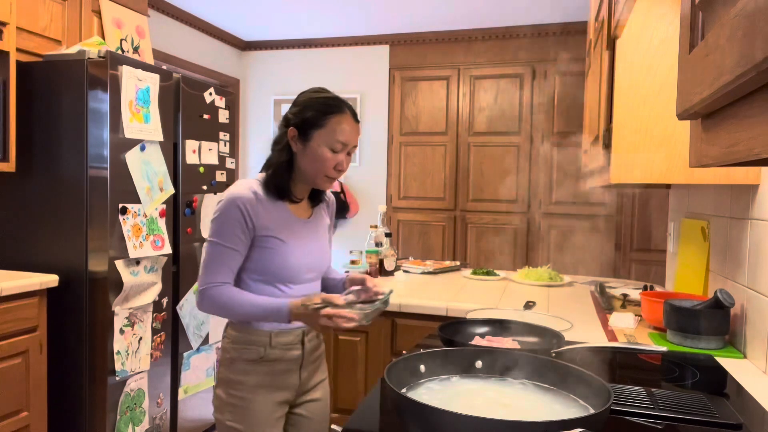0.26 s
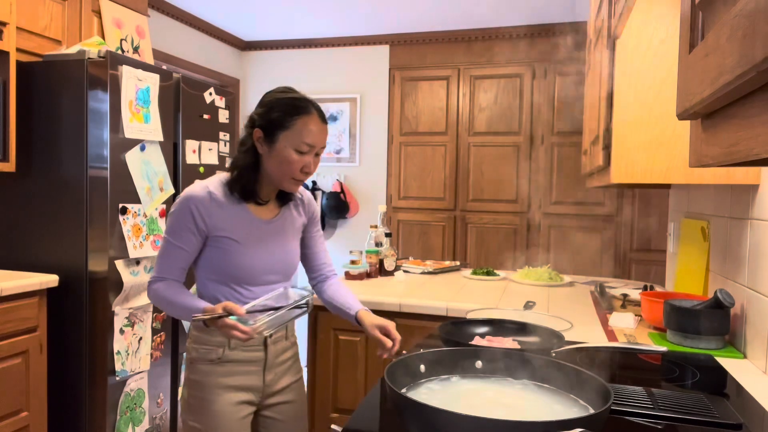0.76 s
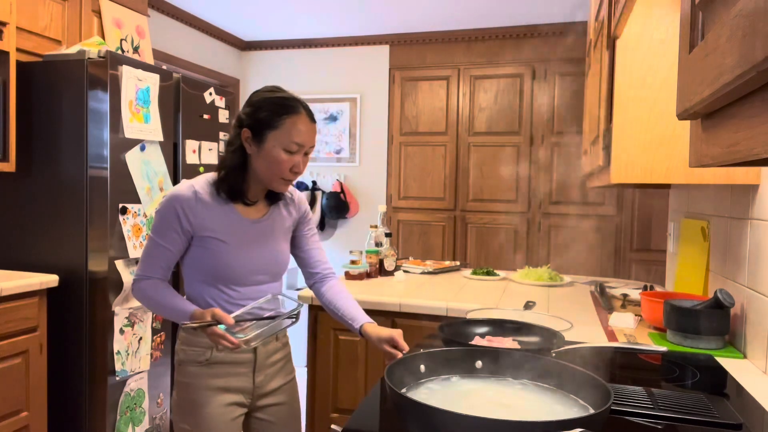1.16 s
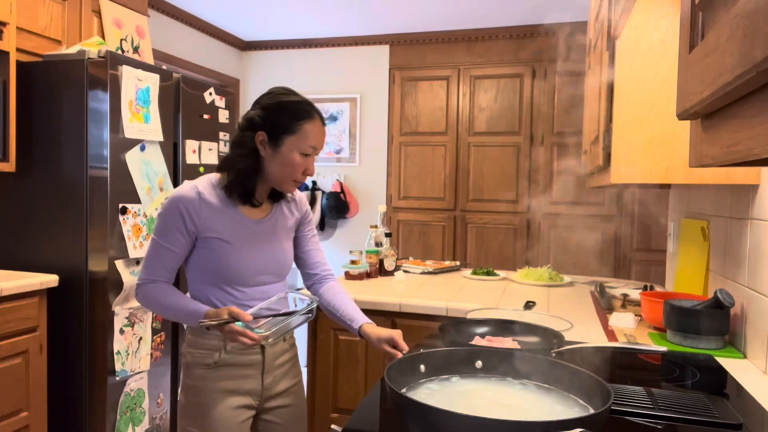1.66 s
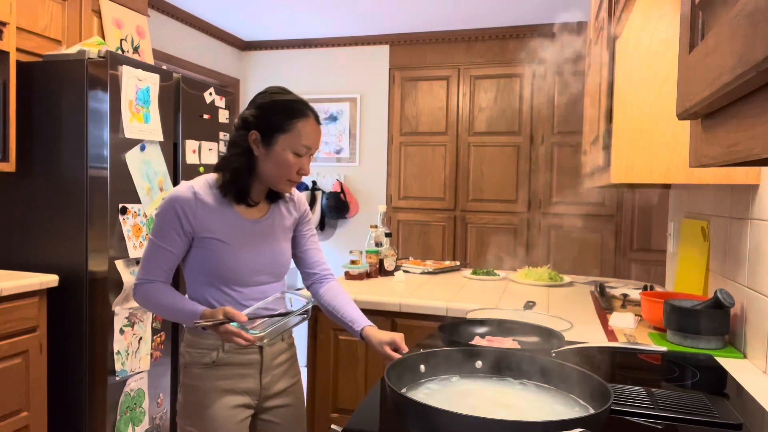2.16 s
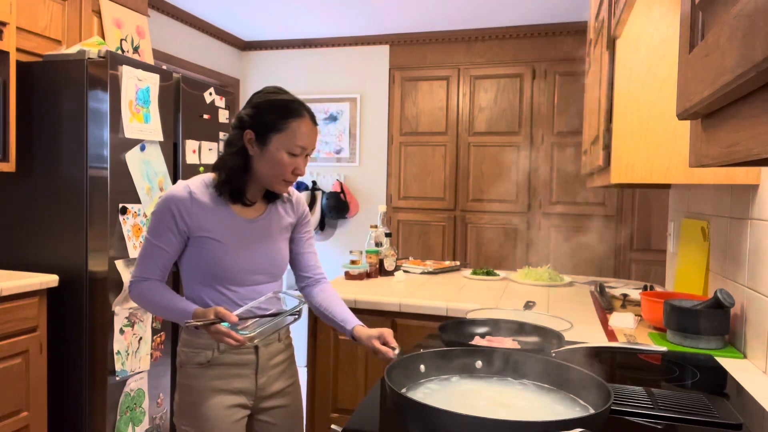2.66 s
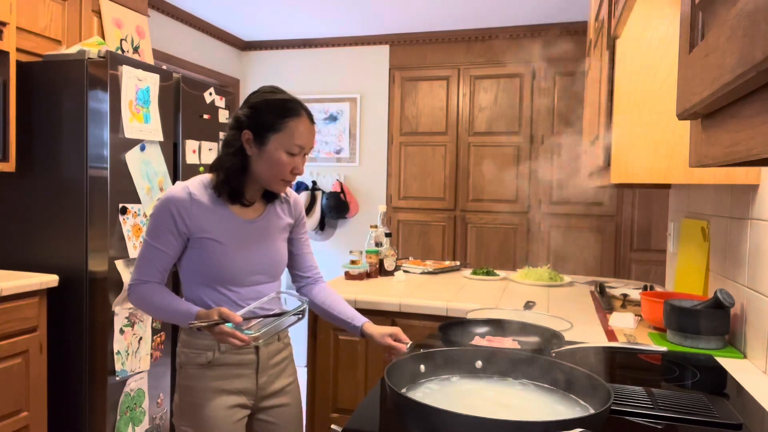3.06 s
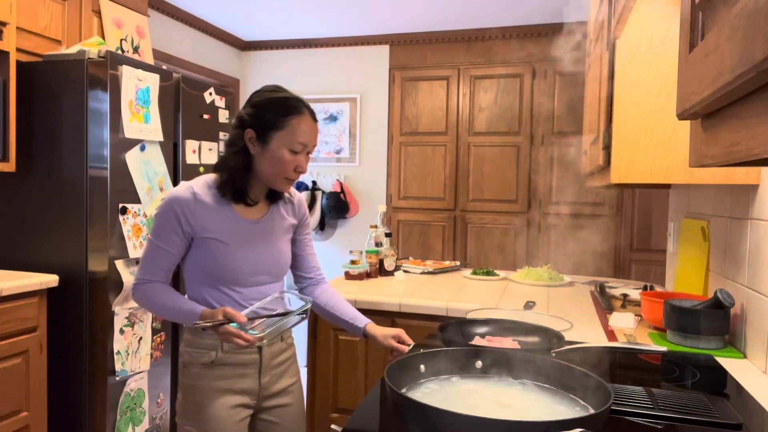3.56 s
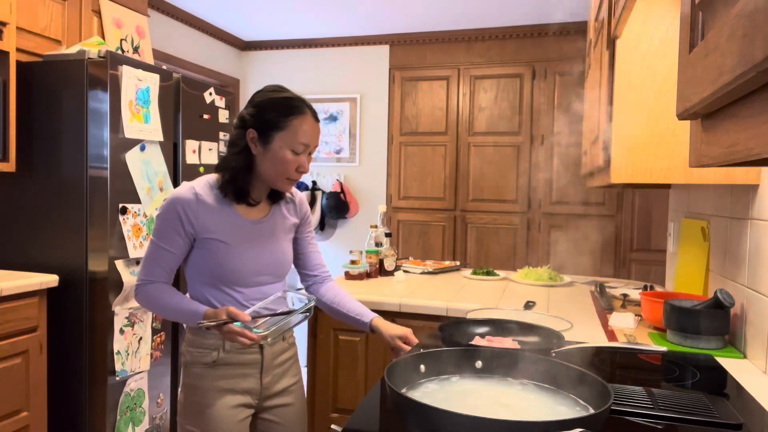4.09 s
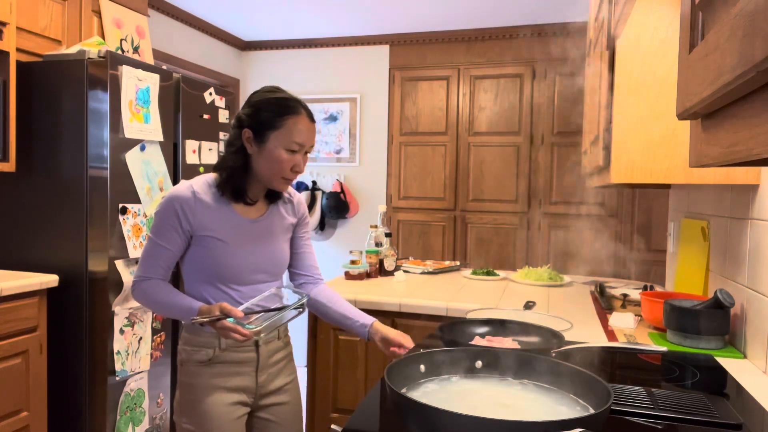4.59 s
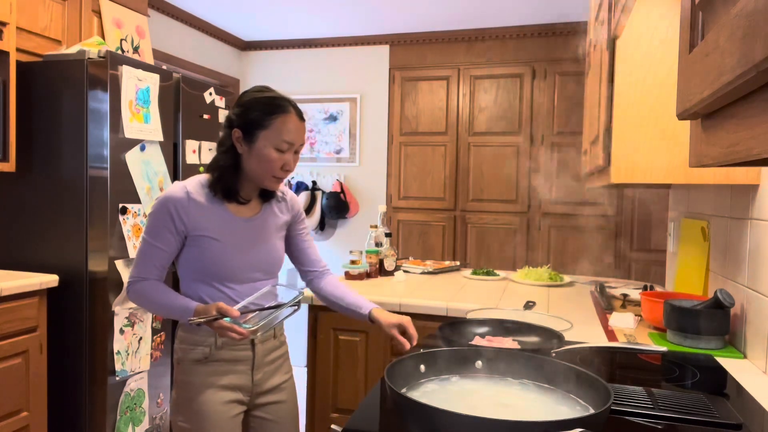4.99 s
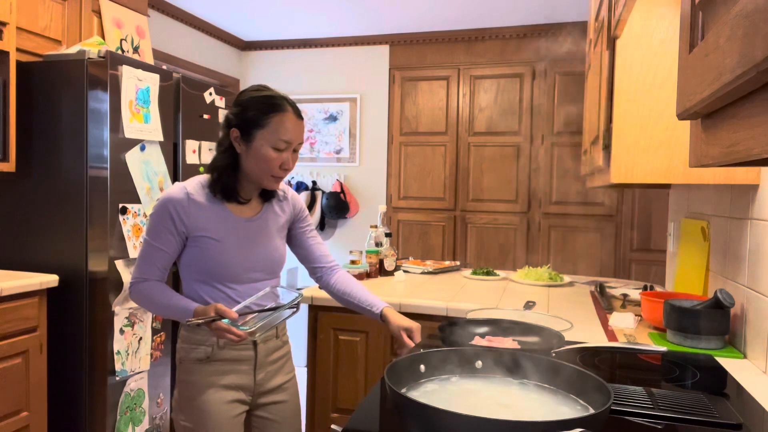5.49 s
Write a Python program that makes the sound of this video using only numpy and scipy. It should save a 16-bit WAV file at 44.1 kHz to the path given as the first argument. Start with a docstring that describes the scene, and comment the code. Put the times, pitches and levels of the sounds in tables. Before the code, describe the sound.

In a small kitchen, a bright glass clink gives way to a long pause, then sharp tong knocks and short scrapes on a pan over a low hum.

```python
"""A small kitchen: metal tongs clink on a glass dish, then knock and scrape on a frying pan.
Each blow is a burst of noise plus ringing tones; thuds are damped swings; scrapes are dense random slips.
A tip squeaks briefly, as a narrow wavering note. The kitchen adds echoes to all of these.
Behind them an extractor fan, made of shaped noise, rushes and rumbles in the room's low resonances.
A hob coil whines faintly on multiples of the mains frequency."""
import sys
import numpy as np
from scipy import signal
from scipy.fft import rfft, irfft
from scipy.io import wavfile
from scipy.ndimage import uniform_filter1d

SR = 44100
rng = np.random.default_rng(int(sys.argv[2]) if len(sys.argv) > 2 else 0)


def transcribe(signal):
    """Save signal, clipped to [-1, 1], as a 16-bit WAV file at the path in sys.argv[1]."""
    frames = np.atleast_2d(signal).T
    limited = np.clip(frames, -1, 1)
    pcm = np.round(limited * 32767).astype(np.int16)
    wavfile.write(sys.argv[1], SR, pcm)


N = 253134  # length in samples
HIT_N = int(.7 * SR)  # length of one blow or echo tail, samples
EARLY = int(.05 * SR)  # samples kept before time zero, so that earlier sounds still reach the room

# The pan's ringing tones, damped quickly by food and handle: f/Hz, relative level/dB, time to fall 60 dB/s
PAN_TONES = [(255, -7, 0.2), (324, -5.5, 0.13), (424, 7.5, 0.077), (506, 9, 0.06), (815, -20, 0.03),
             (1160, 14.5, 0.019), (1506, 11.5, 0.028), (1723, -52, 0.21), (1970, -18, 0.06),
             (2174, -25, 0.032), (2600, -13, 0.021), (2444, -9, 0.063), (3040, -35, 0.16),
             (3430, -16, 0.063), (4410, -39, 0.0642), (5140, -15, 0.086), (4860, -13, 0.034),
             (5830, 6, 0.074), (6800, -32, .05)]


def undb(db):
    """Turn decibels into gain."""
    return 10 ** (np.asarray(db) / 20)


def level(x, db):
    """Scale a sound to an rms level in dB."""
    return x * undb(db) / np.sqrt(np.mean(x ** 2) + 1e-30)


def decay(t, t60):
    """Die away by 60 dB in t60 seconds, as a damped vibration does."""
    return np.exp(-np.log(1000) * t / t60)


def on_log(table, n, col=1):
    """Read a table at the frequencies of an n-point transform, with straight lines over log frequency."""
    table = np.array(table, float)
    hz = np.fft.rfftfreq(n, 1 / SR)
    return np.interp(np.log(hz + 1), np.log(table[:, 0]), table[:, col])


def band_share(centres_hz, k):
    """Weight of band k: one at its centre, falling to zero at the neighbouring centres."""
    return on_log([(hz, j == k) for j, hz in enumerate(centres_hz)], HIT_N)


def colour(x, table):
    """Shape a sound's spectrum by (Hz, dB) points."""
    return irfft(rfft(x) * undb(on_log(table, x.shape[-1])), x.shape[-1])


def peak(hz, width_hz):
    """A resonance curve, one at its centre, over the frequencies of the whole length."""
    offset = np.fft.rfftfreq(N, 1 / SR) - hz
    return 1 / (1 + (offset / (width_hz / 2)) ** 2)


def walk(rate):
    """Random values drawn rate times a second and smoothed twice, with mean 0 and spread 1."""
    hold = int(SR / rate)
    steps = np.repeat(rng.standard_normal(N // hold + 1), hold)
    x = uniform_filter1d(uniform_filter1d(steps, hold), hold)[:N]
    return (x - x.mean()) / x.std()


def add(out, s, x):
    """Mix x in from time s; the buffer starts a little before zero."""
    i = int(s * SR) + EARLY
    x = x[:len(out) - i]
    out[i:i + len(x)] += x


def ring(modes):
    """A struck body rings as damped tones, with alternate signs down the list and unit total energy."""
    t = np.arange(HIT_N) / SR
    x = 0
    for k, (hz, db, t60) in enumerate(modes):
        x = x + (-1) ** k * undb(db) * np.sin(2 * np.pi * hz * t) * decay(t, t60)
    return x / np.sqrt(np.sum(x ** 2))


def blows(hits, modes, colour_db, ring_db):
    """Each blow cracks as it chatters and rings body and tongs; flat ones boom, hard ones are bright."""
    # The tongs' ringing tones: f/Hz, relative level/dB, time to fall 60 dB/s
    tongs_tones = [(3275, -5, .07), (3480, -8, .04), (3808, -9, .1), (7780, -6, .08), (7812, -5, .09),
                   (7990, -7, .07), (8105, -6, .09), (8380, -10, .07), (12310, -12, .07), (14347, 2, .11)]
    # Centres of the bands whose strengths are set one by one, the last for the tick: f/Hz
    bands_hz = (400, 750, 980, 1400, 2300, 3500, 5200, 8000, 14300)
    # How much of the boom each band below the tick takes: share
    boom_share = (0.88, .4, 0.56, 0, 0.38, 0.6, 0.06, 0.55)
    knee_hz = 1400  # a harder contact brightens everything above this
    clank_octaves = 0.44  # the spot struck lifts the tones this near its pitch
    rise_s, rise_cycles = 0.001, 1.13
    first = int(.03 * SR)  # levels are set over the first 30 ms

    out, t = np.zeros(N + EARLY), np.arange(HIT_N) / SR
    body = ring(modes)
    tongs = ring(tongs_tones) * (1 - np.exp(-(t / rise_s) ** 2))
    hz = np.array(bands_hz[:-1])
    octaves = np.clip(np.log2(hz / knee_hz), 0, None)
    for s, strength_db, boom_db, tilt_db, clank_hz, clank_db, tick_db, chatter, tongs_db in hits:
        crack = rng.standard_normal(HIT_N) * np.exp(-t / chatter)
        crack = crack / np.sqrt(np.sum(crack ** 2))
        spectrum = rfft(crack + undb(ring_db) * body)

        band_db = strength_db + np.array(colour_db)
        band_db = band_db + boom_db * np.array(boom_share) + tilt_db * octaves
        clank_nearness = np.exp(-(np.log2(hz / clank_hz) / clank_octaves) ** 2)
        band_db = band_db + clank_db * clank_nearness

        sound = tongs * undb(tongs_db) / np.std(tongs[:first])
        for k, db in enumerate([*band_db, tick_db]):
            band = irfft(spectrum * band_share(bands_hz, k), HIT_N)
            # low tones need a few swings to build up, so the bass comes late
            build_s = rise_s + rise_cycles / bands_hz[k]
            band = band * (1 - np.exp(-(t / build_s) ** 2))
            sound = sound + band * undb(db) / np.std(band[:first])
        add(out, s, sound[:HIT_N - first])
    return out


def clinks():
    """The tongs strike the glass dish, which rings clearly through the crack of the contact."""
    # Blows on the dish, levels before room and final mix: t/s, strength/dB, boom/dB,
    # treble slope/dB per octave, clank f/Hz, clank lift/dB, top tick level/dB, chatter decay/s, tongs level/dB
    dish_hits = [(-0.03, -40.5, -5, 1, 5100, -5, -48, 0.036, -73),
                 (0.0840, -32, -7.5, -4, 3230, 5.5, -63, 0.014, -62)]
    # The dish's ringing tones: f/Hz, relative level/dB, time to fall 60 dB/s
    dish_tones = [(1834, -15, 0.073), (2014, -1, 0.15), (2290, -6, 0.085), (2600, -13, .12),
                  (2960, -1.5, 0.089), (3258, 7, 0.038), (3940, -66, 0.065), (5040, -10, 0.12),
                  (5275, 15, 0.019), (5609, -7.5, 0.23), (6915, -5.5, 0.062), (7100, -12.5, 0.065),
                  (13160, -43, .1)]
    # The dish's own balance, one value per band below the tick: level/dB
    dish_colour = (-16.5, -18.5, -19.5, -6.5, -8.5, 6.5, 1.5, -1.5)
    return blows(dish_hits, dish_tones, dish_colour, ring_db=9)


def knocks():
    """The tongs strike the pan, whose ringing is weaker than the crack."""
    # Blows on the pan, levels before room and final mix: t/s, strength/dB, boom/dB,
    # treble slope/dB per octave, clank f/Hz, clank lift/dB, top tick level/dB, chatter decay/s, tongs level/dB
    pan_hits = [(2.1233, -63.5, 14, -27, 1164, 8.4, -83, 0.0046, -87),
                (2.4666, -56.5, 3, -6, 3260, 10.4, -50, 0.015, -86),
                (3.1678, -33.5, -13.5, -6, 1770, 4.8, -59, 0.0073, -57),
                (3.5322, -65.5, 26, -28, 1400, 5.5, -90, 0.0058, -88),
                (3.6127, -52, 0.5, -6.5, 2300, 2.5, -84, 0.0043, -83),
                (3.6241, -57, 19.5, -19.5, 1480, 6.3, -88, 0.0034, -76),
                (3.9842, -33.5, -8, -3, 3370, 8.2, -59, 0.0041, -28.5),
                (4.005, -49.5, 13, 1.5, 2400, 4.5, -67, 0.0024, -38),
                (4.1919, -38.5, 1.5, -5.5, 1780, 7, -78, 0.0027, -53),
                (4.6128, -44.5, -4, -14, 1920, 9.2, -66, 0.0086, -72),
                (4.6189, -46.5, 6, -9.5, 1530, 3.2, -70, 0.005, -76),
                (4.7749, -52, -2, -2.5, 2700, 5.5, -62, 0.002, -58),
                (5.2486, -68.5, 1, -16, 1900, 5, -82, 0.003, -86)]
    # The pan's own balance, one value per band below the tick: level/dB
    pan_colour = (4.5, -1, -7, -3.5, 0.5, -2, 0.5, 0)
    return blows(pan_hits, PAN_TONES, pan_colour, ring_db=-13)


def thumps():
    """The pan's weight rocks on the hob: soft low thuds, one damped swing each."""
    # Thuds, levels before room and final mix: t/s, f/Hz, level/dB, time to fall 60 dB/s
    thuds = [(3.993, 64.8, -36, 0.43), (3.999, 99, -22.5, 0.14), (4.006, 255, -31, 0.12),
             (4.195, 260, -30.5, 0.1), (4.778, 230.4, -31.5, 0.14)]
    out, t = np.zeros(N + EARLY), np.arange(HIT_N) / SR
    for s, hz, db, t60 in thuds:
        swing = np.sin(2 * np.pi * hz * t) * (1 - np.exp(-t / 0.0018))
        add(out, s, undb(db) * swing * decay(t, t60))
    return out


def scrape():
    """Dense uneven slips of the tong tips excite the pan; the treble is the rasp of the contact."""
    # Drags of the tips, levels before room and final mix: loudest t/s, swell/s, fade/s, level/dB,
    # treble against it/dB
    drags = [(3.47, 0.055, 0.062, -43, -18.5), (3.538, 0.15, 0.092, -36.5, -30.5),
             (4.55, 0.1, 0.08, -49.5, -16.5), (4.633, 0.09, 0.13, -43, -12.5),
             (5.255, 0.095, 0.069, -57.5, -16.5)]
    fade_db = 23.5  # change over one swell or fade time

    slip_db = 2.2 * rng.exponential(size=N) + 2.5 * walk(60)
    slipping = rng.random(N) < .12
    slips = rng.standard_normal(N) * undb(slip_db) * slipping
    ringing = signal.fftconvolve(slips, ring(PAN_TONES))[:N]
    pan = level(ringing, -14.0) + level(slips, 0)
    low = colour(pan, [(230, -57), (350, 3.0), (780, 2.5), (1000, -16.5),
                       (1600, -12.0), (2600, -18.5), (4000, -74)])
    rasp = colour(pan, [(1800, -52), (3000, 5), (9000, -12), (14000, -10)])
    low, rasp = level(low, 0), level(rasp, 0)

    t, out = np.arange(N) / SR, 0
    for s, swell, fade, db, treble_db in drags:
        away = np.maximum((s - t) / swell, (t - s) / fade)
        strength = undb(db - fade_db * np.minimum(away, 8))
        out = out + strength * (low + undb(treble_db) * rasp)
    return out


def squeak():
    """A tip sticks and slips: a short wavering note, made of narrow noise held at even strength."""
    # The squeak, level before room and final mix: start t/s, end t/s, f/Hz, width/Hz, peak level/dB
    squeak_note = (4.5, 4.57, 1900, 80, -61)
    start, end, hz, width_hz, db = squeak_note
    t = np.arange(N) / SR
    note = irfft(rfft(rng.standard_normal(N)) * peak(hz, width_hz), N)
    note = note / np.abs(signal.hilbert(note))
    ramps = np.clip(np.minimum(t - start, end - t) / .02, 0, 1)
    return undb(db) * note * ramps


def kitchen(x, wet_db):
    """The direct sound, then echoes that thicken and die band by band, other ones for each side."""
    # How long the room rings in each band: f/Hz, time to fall 60 dB/s
    echo_bands = [(300, 0.2), (800, 0.37), (2100, 0.39), (5500, 0.36), (14000, 0.12)]
    build_s = 0.00044
    centres_hz = [hz for hz, _ in echo_bands]
    t = np.arange(HIT_N) / SR
    tail = 0
    for k, (_, t60) in enumerate(echo_bands):
        noise = rfft(rng.standard_normal((2, HIT_N)))
        noise = irfft(noise * np.sqrt(band_share(centres_hz, k)), HIT_N)
        tail = tail + noise * decay(t, t60)
    tail = tail * (1 - np.exp(-t / build_s))
    tail = tail * undb(wet_db) / np.sqrt(np.sum(tail ** 2, axis=1, keepdims=True))
    tail[:, 0] = 1  # the direct sound
    return signal.fftconvolve(x[None], tail, axes=1)[:, EARLY:EARLY + N]


def fan():
    """Broad airflow noise that swells a little, and a narrow rumble where the room resonates."""
    # Spectrum of fan and room tone: f/Hz, relative level/dB
    air_spectrum = [(20, -47), (40, -12), (70, -7.5), (195, -16.5), (260, -17.5), (500, -22.5), (720, -29),
                    (1000, -33.5), (1350, -35), (1900, -44), (3000, -52), (6000, -59), (14500, -65),
                    (15600, -85)]
    # The hood's duct colours the airflow: f/Hz, width/Hz, lift/dB
    duct_peaks = [(404, 53, 6), (650, 66, 10.5), (1310, 13, 9)]
    # The rumble's strength wavers: t/s, level/dB
    rumble_levels = [(0.0, -39.5), (0.03, -47), (1.65, -45.5), (1.68, -56.5), (1.82, -39), (1.95, -53),
                     (2.14, -38.5), (2.24, -47.5), (3.18, -46.5), (3.32, -51.5), (4.57, -43), (4.87, -49.5),
                     (4.91, -38.5), (5.04, -51.5), (5.45, -45), (5.5, -54.5), (5.66, -39.5), (5.74, -71)]
    air_db = -49.5  # before the swell
    rumble_hz, rumble_width_hz, evenness = 123.4, 38.4, 0.13

    duct = undb(sum(db * peak(hz, width) for hz, width, db in duct_peaks))
    air = colour(rng.standard_normal((2, N)), air_spectrum)
    air = irfft(rfft(air) * duct, N)
    air = level(air, air_db) * undb(.5 * walk(3))

    rumble = irfft(rfft(rng.standard_normal((2, N))) * peak(rumble_hz, rumble_width_hz), N)
    # partly even out the noise's own swelling, so the strength mainly follows the slow wavering
    power = uniform_filter1d(uniform_filter1d(rumble[0] ** 2, size=800), size=800)
    rumble = level(rumble / power ** evenness, 0)
    s, db = np.transpose(rumble_levels)
    return air + rumble * undb(np.interp(np.arange(N) / SR, s, db))


def whine():
    """A coil buzzes once a mains cycle: thin lines on mains multiples, with some hiss around them."""
    # The coil's lines, levels before the wavering: multiple of the mains frequency, level/dB
    coil_lines = [(111, -99), (112, -92), (113, -93), (115, -99), (119, -93), (120, -99), (121, -90),
                  (122, -96), (186, -93), (188, -92), (189, -82), (190, -81), (191, -88), (192, -95),
                  (193, -89), (194, -95), (195, -98), (197, -92), (200, -91), (201, -85), (202, -89),
                  (203, -90), (204, -85), (206, -87), (208, -99), (209, -100), (210, -98)]
    mains_hz = 59.978
    t = np.arange(N) / SR
    phase = 2 * np.pi * rng.random((len(coil_lines), 1))
    multiple, db = np.transpose(coil_lines)[:, :, None]
    tones = np.cos(2 * np.pi * multiple * mains_hz * t + phase)
    lines = np.sum(np.sqrt(2) * undb(db) * tones, axis=0)
    # slow noise multiplied onto the lines spreads each one into hiss
    lowpass = signal.butter(1, 120, fs=SR, output="sos")
    smear = signal.sosfilt(lowpass, rng.standard_normal((2, N)))
    return lines * (undb(walk(8) - 1) + level(smear, -14))


def scene():
    """Blows and scrapes sound in the kitchen over fan and coil; the held dish is drier than the pan."""
    pan = knocks() + thumps()
    add(pan, 0, scrape() + squeak())
    tongs = kitchen(clinks(), wet_db=0.5) + kitchen(pan, wet_db=6.5)
    return undb(-10.5) * tongs + fan() + whine()


def record(dry):
    """The right side is partly an early copy of the left, turned over where their likeness is negative."""
    # Stereo by frequency: f/Hz, likeness of right to left (limited to -1..1 below), left minus right/dB
    stereo = [(31.5, -0.1, 7), (166, 1.92, -9.5), (188.5, -0.82, 5), (372, 0.24, -4.5), (527, 0.1, 0),
              (776, -0.25, -5), (916, -3.5, 3), (1093, 0.73, -2), (6640, -0.36, 1.5), (6860, -1.23, 1.5),
              (15000, -5.72, -0.5)]
    lead_s, bass_cut_hz, top_hz = 2 / 10550, 50, 16000

    left, other = rfft(dry)
    like = np.clip(on_log(stereo, N), -1, 1)
    balance = undb(on_log(stereo, N, col=2) / 2)
    early = np.exp(2j * np.pi * np.fft.rfftfreq(N, 1 / SR) * lead_s)
    right = like * early * left + np.sqrt(1 - like ** 2) * other
    both = irfft(np.array([left * balance, right / balance]), N)
    # deep bass and the very top are cut
    both = signal.sosfilt(signal.butter(2, bass_cut_hz, "high", fs=SR, output="sos"), both)
    return signal.sosfilt(signal.ellip(10, .2, 80, top_hz, fs=SR, output="sos"), both)


dry = scene()
out = record(dry)
transcribe(out)
```